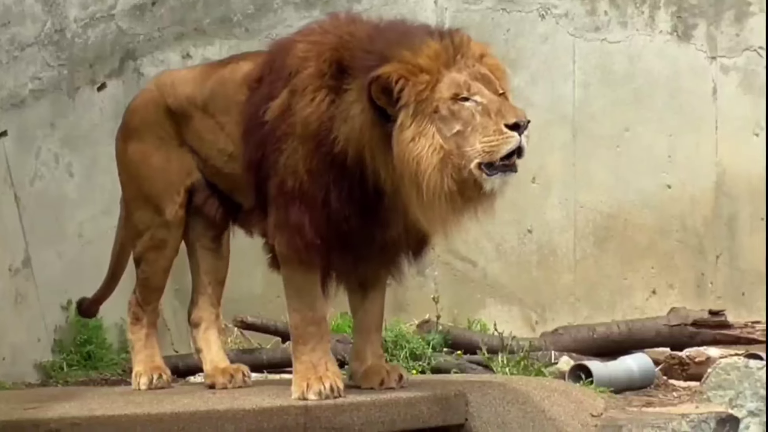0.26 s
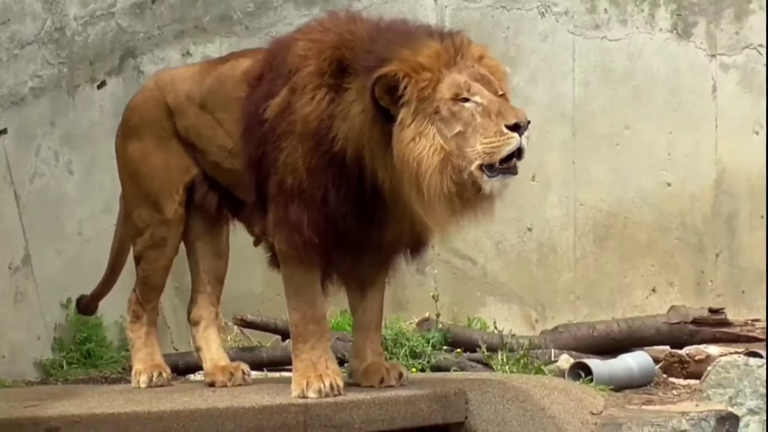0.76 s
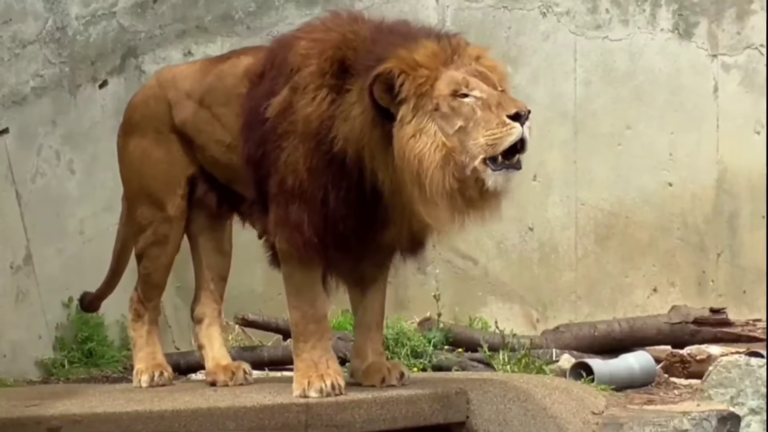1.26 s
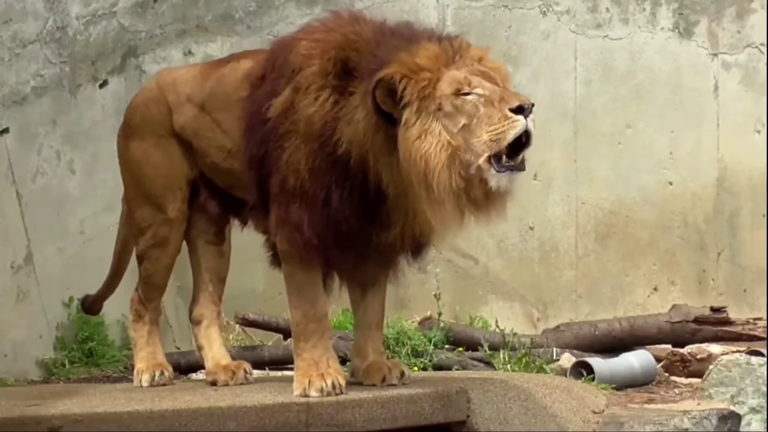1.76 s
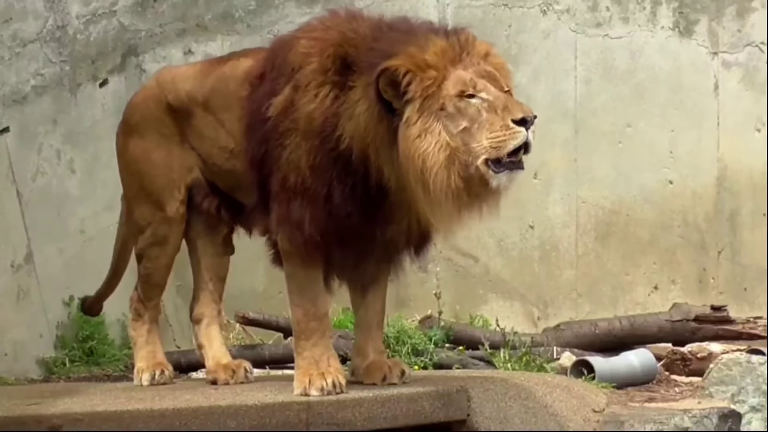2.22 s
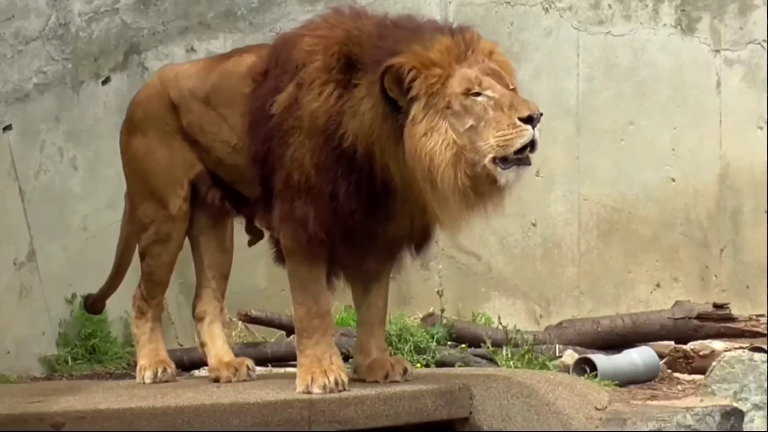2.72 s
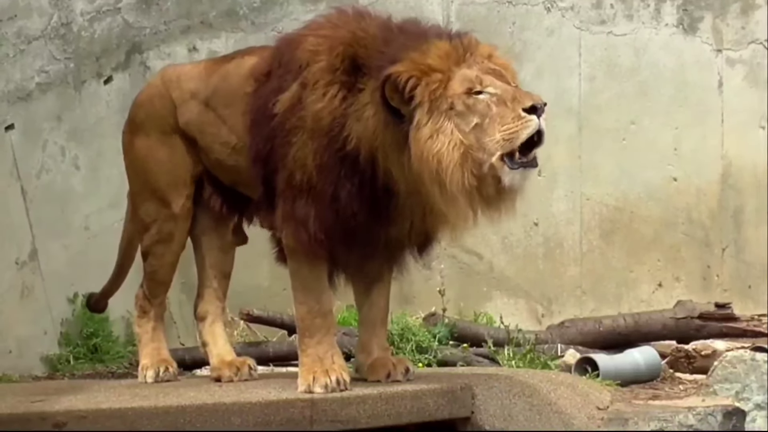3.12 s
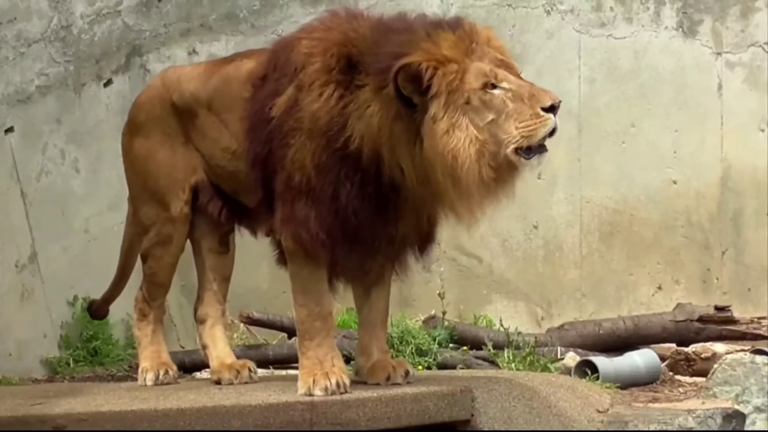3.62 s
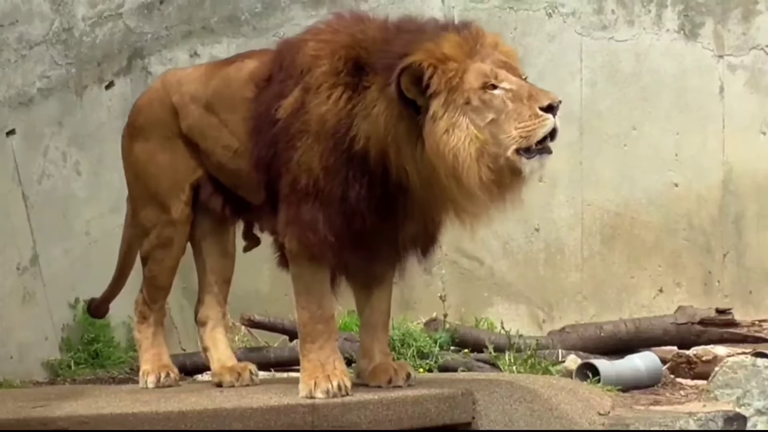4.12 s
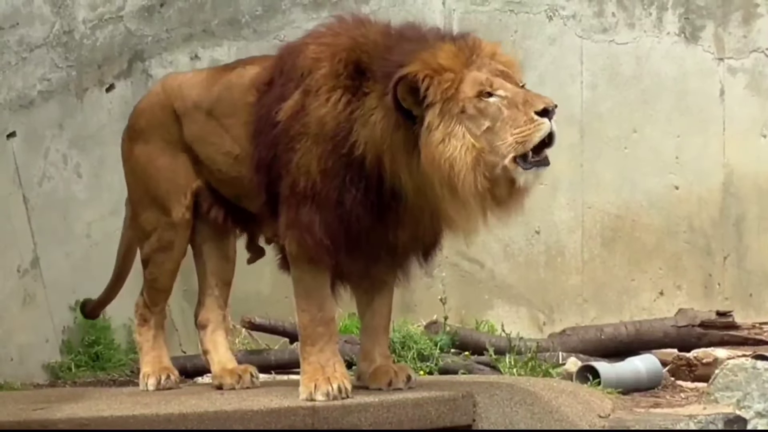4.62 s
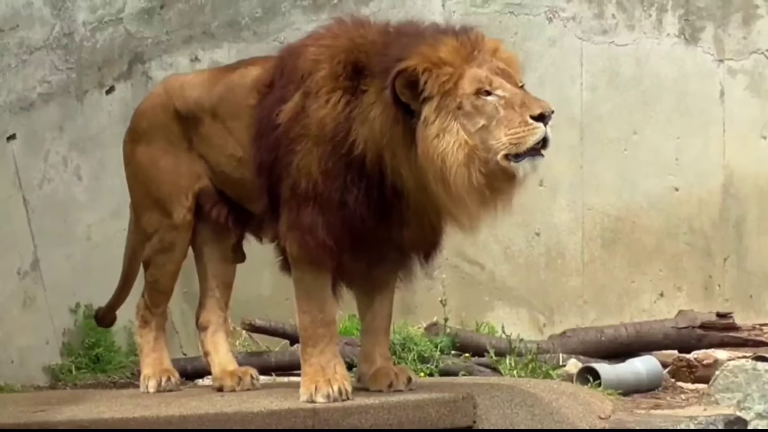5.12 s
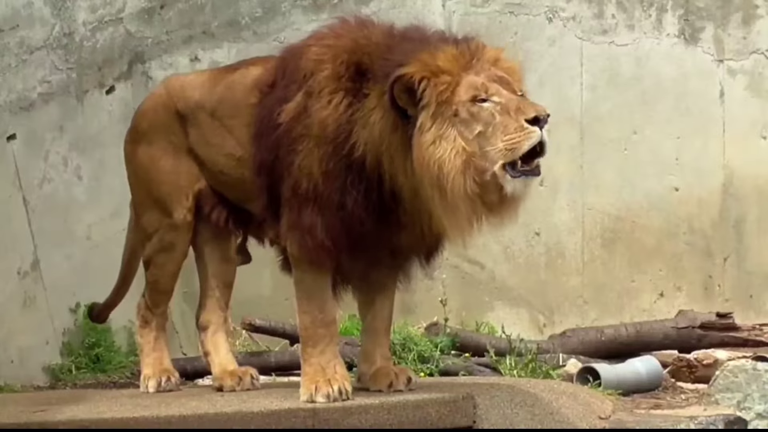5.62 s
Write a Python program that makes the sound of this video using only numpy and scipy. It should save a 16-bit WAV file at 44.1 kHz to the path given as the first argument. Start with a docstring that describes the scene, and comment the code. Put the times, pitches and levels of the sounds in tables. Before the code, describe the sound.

A lion gives eight hoarse, short grunting roars in a concrete enclosure, gradually spacing out and tiring, over faint outdoor air.

```python
"""Quiet outdoor air and a low draught lie under everything, and the echo of an earlier grunt hangs in the walls.
A lion then gives eight hoarse grunts in a concrete enclosure, the later ones further apart and more tired.
Each starts as a deep tone that arches up, breaks into a rasp with a rush of air, and sinks to a low groan.
Flapping folds drive throat and mouth resonances; the walls echo and keep one low note ringing.
Faint scuffs of grainy noise fall between the grunts and after the last."""
import sys
import numpy as np
from scipy import signal
from scipy.fft import rfft, irfft, next_fast_len
from scipy.io import wavfile
from scipy.ndimage import uniform_filter1d

SR = 44100
rng = np.random.default_rng(int(sys.argv[2]) if len(sys.argv) > 2 else 0)


def store_pcm(level_fs):
    """Save levels as 16-bit WAV."""
    pcm = np.round(np.clip(level_fs, -1, 1) * 32767).astype(np.int16)
    wavfile.write(sys.argv[1], SR, np.atleast_2d(pcm).T)


N = 258955
LEAD = SR  # samples: the scene starts one second early, so the walls already ring
SIZE = next_fast_len(N + LEAD, True)

# The grunts of the lion. Each row: start in seconds, length in seconds, reference pitch in Hz,
# slowness factor of its course, roughness factor, tiredness 0-1, tuning factor of the mouth,
# opening catch in dB, then trims in dB for opening tone, closing groan, throat, mouth and rush of air.
GRUNTS = [(.189, .355, 191.6, 1, 1.04, 0.02, .96, -8, 2.2, 3, 0.5, 0, 1),
          (.835, 0.31, 193.3, 0.99, 0.94, 0.17, 0.98, -8, 1.5, 1.5, -2, -.5, .5),
          (1.446, .29, 186.5, 0.93, 1.25, 0.12, 0.97, -15, 0.5, .3, 0, .3, 0.5),
          (2.079, 0.28, 187.2, 1.016, 1.4, 0.18, .98, -6, -1, -.5, 0, 1, 0.5),
          (2.755, .3, 185.7, .92, 1.36, 0.4, 1.0, -8, -.7, -.7, .7, 1.7, 1),
          (3.44, 0.31, 190.6, 1.0, 1.146, 0.67, 1.01, -11, 0, -2, -.5, .3, -.3),
          (4.203, 0.3, 189.9, 1.154, 1.15, 0.68, 1.0, -9, -1.3, .5, 3.3, .3, -1.3),
          (5.006, .29, 179.9, 1.4, 1.07, .95, 0.95, -7, -.5, -2.5, 2.7, -.3, 0)]
EARLIER_S = -.431  # start of a grunt just before, which still echoes
LEAD_IN_S, RELEASE_S = .04, 0.1  # every grunt swells before its start and dies away after its end


def gain_of(db):
    """Decibels to gain."""
    return 10 ** (np.asarray(db) / 20)


def evened(x):
    """Scales to rms 1."""
    return x / np.sqrt(np.mean(x ** 2) + 1e-20)


def steadied(x, size=1500):
    """Holds the short-term rms near 1 and keeps the fine grain."""
    power = uniform_filter1d(uniform_filter1d(x ** 2, size), size)
    return x / np.sqrt(power + 1e-12)


def read(points, hz):
    """Reads a table on a log-frequency axis."""
    f, value = np.transpose(points)
    return np.interp(np.log(hz + 1), np.log(f + 1), value)


def add(mix, s, sound):
    """Mixes a sound in at time s, in seconds."""
    part = mix[:, LEAD + round(s * SR):][:, :sound.shape[-1]]
    part += sound[..., :part.shape[1]]


def noise(spectrum, size):
    """Noise of rms 1, white noise shaped to the given spectrum."""
    bins = rfft(rng.standard_normal(size))
    return evened(irfft(bins * gain_of(read(spectrum, np.fft.rfftfreq(size, 1 / SR))), size))


def wander(hz, size):
    """Random drift of about rms 1: white noise low-passed at the given rate."""
    white = rng.standard_normal(size + SR // 2)  # the extra half second lets the filter settle
    return evened(signal.sosfilt(signal.butter(2, hz, fs=SR, output="sos"), white))[-size:]


def resonate(x, hz, width):
    """A steep resonance of gain 1 that follows the curve hz: shift down, smooth twice, shift back."""
    turn = np.exp(2j * np.pi * np.cumsum(hz * np.ones(len(x))) / SR)
    r = np.exp(-np.pi * width / SR)
    smooth = signal.lfilter([(1 - r) ** 2], [1, -2 * r, r * r], x / turn)
    return 2 * (turn * smooth).real


def tract(drive, modes, tuning):
    """The vocal tract: the drive passes side by side through a set of resonances."""
    return sum(gain_of(db) * resonate(drive, hz * tuning, width) for hz, width, db in modes)


def outdoor_air(level_db=-42):
    """Quiet outdoor air: steady, dark noise, independent on the two sides."""
    # Spectrum of the air. Each row: frequency in Hz, relative density in dB per Hz.
    air_spectrum = [(20, -3.5), (80, 11), (150, 10.5), (250, 4.5), (400, -9), (800, -6), (1200, -8),
                    (1800, -24.5), (4000, -30), (8000, -34.5), (12000, -34), (15000, -41)]
    return gain_of(level_db) * np.array([noise(air_spectrum, SIZE) for _ in range(2)])


def draught(level_db=-45, swell_db=1.5):
    """Air moving over the microphones: drifting low rumble, in opposite phase left and right."""
    # Spectrum of the rumble. Each row: frequency in Hz, relative density in dB per Hz.
    draught_spectrum = [(10, -17), (25, -10), (50, 7), (75, -17), (130, -26), (400, -66), (2000, -100)]
    level = gain_of(level_db + swell_db * wander(3, SIZE))
    return level * noise(draught_spectrum, SIZE) * np.array([[1], [-1]])


def wall_note(wall_hz=148.5, waver_hz=1.3, beat_db=2):
    """A standing wave between the walls: each grunt renews it, later ones less; it wavers and dies slowly."""
    first_db, fade_db_per_s, earlier_db = -26.5, 1.5, -21.5
    build_s, hold_s, decay_db_per_s = 0.34, 0.64, 24
    renewals = [(EARLIER_S, earlier_db)]
    renewals += [(row[0], first_db - fade_db_per_s * row[0]) for row in GRUNTS]
    t = (np.arange(SIZE) - LEAD) / SR
    level = np.zeros(SIZE)
    for start, db in renewals:
        build = np.clip((t - start) / build_s, 0, 1)
        decay_db = decay_db_per_s * np.maximum(t - start - hold_s, 0)
        level = np.maximum(level, build * gain_of(db - decay_db))
    beating = gain_of(beat_db * wander(11.4, SIZE))
    hz = wall_hz + waver_hz * wander(14.2, SIZE)
    return level * beating * np.sin(2 * np.pi * np.cumsum(hz) / SR)


def swell(age, length, push):
    """Gain that rises, holds, sags, and is released when the grunt ends."""
    peak_db, full, rise, held, sag, release = push
    rise_db = rise * np.maximum(full - age, 0)
    sag_db = sag * np.maximum(age - held, 0)
    release_db = release * np.maximum(age - length, 0)
    return gain_of(peak_db - rise_db - sag_db - release_db)


def flapping_folds(turns, rough, shimmer=0.68, doubling=.45):
    """Heavy folds flap unevenly, giving harmonics, and let out a noisy puff of air each cycle."""
    size = len(turns)
    alternation = doubling * rough * np.cos(np.pi * turns)  # strong and weak cycles
    flap = np.maximum(1 + shimmer * rough * wander(77.4, size) + alternation, 0)
    folds = flap * sum(np.cos(2 * np.pi * k * turns) for k in range(1, 18))
    breath = noise([(2500, -3), (4000, -48)], next_fast_len(size))[:size]
    puffs = flap * (0.25 + np.exp(-(turns % 1) / 0.17)) * breath
    drive = (1 - rough) * evened(folds) + rough * evened(puffs)
    return flap, puffs, drive


def deep_tone(turns, flap, puffs, rough, growl_db=-4):
    """A clean fundamental, joined by a growl of puffs in low resonances as the folds roughen."""
    growl = evened(tract(puffs, [(94, 10, -4), (138, 15, 6.5), (198, 16, 3.5)], 1))
    return np.sqrt(flap) * np.sin(2 * np.pi * turns) + gain_of(growl_db) * rough ** 0.95 * growl


def throat_sound(drive, opening, deep_db):
    """The long throat resonates; its weight leaves the deepest resonance as the mouth opens."""
    # Throat resonances, then the deepest one. Each row: frequency in Hz, width in Hz, level in dB.
    throat_modes = [(360, 46, -1), (408, 28, -4), (455, 36, -4.5), (492, 30, -3.5)]
    deepest_mode = (317, 38, 0)  # nominal frequency, tuned slightly down below
    deep = gain_of(deep_db) * (1 - 0.68 * opening) * tract(drive, [deepest_mode], 0.99)
    return (0.3 + 0.67 * opening) * tract(drive, throat_modes, 1) + deep


def mouth_sound(drive, opening, jaw_bend, mouth_tuning, rise, tired, lips_db):
    """Jaw, mouth and upper resonances; the lips ring more as the mouth opens."""
    # Resonances of jaw, mouth, upper tract and lips, before tuning.
    # Each row: frequency in Hz, width in Hz, level in dB.
    jaw_modes = [(680, 65, 3), (742, 42.4, 6.5), (820, 56, 1.8)]
    mouth_modes = [(945, 57, 1.5), (1190, 45, -15)]
    upper_modes = [(1610, 46, -22.5), (2280, 110, -25), (2680, 76, -37)]
    lips_mode = (1044, 80, -2.8)
    tuning = mouth_tuning * (1 + rise * opening)
    jaw = tract(drive, jaw_modes, mouth_tuning * jaw_bend)
    mouth = tract(drive, mouth_modes, tuning)
    upper = (1 - 0.55 * opening) * (1 - 0.3 * tired) * tract(drive, upper_modes, 1)
    lips = gain_of(lips_db) * (0.35 + 0.81 * opening) * tract(drive, [lips_mode], tuning)
    return jaw + mouth + upper + lips


def rush_of_air(turns, flap):
    """Bright hiss, partly common to both sides, that pulses with the folds and flickers at random."""
    # Spectrum of the hiss. Each row: frequency in Hz, relative density in dB per Hz.
    rush_spectrum = [(700, -23), (1400, -3), (2000, -3.5), (3200, -3.3), (3900, -1.2), (4800, -3.5),
                     (6800, -4.5), (8000, -.5), (10500, -3.5), (12500, -7), (14000, -13), (15400, -23)]
    size = len(turns)
    hiss = np.array([noise(rush_spectrum, next_fast_len(size))[:size] for _ in range(3)])
    pulse = 1 + 0.14 * flap * np.cos(2 * np.pi * turns)
    return evened((hiss[:2] + 0.58 * hiss[2]) * pulse * gain_of(1.3 * wander(90, size)))


def grunt(row, jitter=0.0908, usual_s=.31):
    """Folds and puffs of air sound through throat and mouth, each part with its own swell."""
    # The course of every grunt. Each row: seconds from its start before slowing, pitch factor,
    # roughness 0-1 before scaling, mouth opening 0-1, jaw tuning factor.
    gesture = [(-.04, .86, 0.12, 0.3, 0.984), (0, .93, 0.35, 0, .98), (0.026, 1.03, 0.33, 0.07, 1.0),
               (.062, .84, 0.42, 0.6, 1.01), (0.099, .78, 0.58, 0.76, 1.0), (0.152, .82, 0.95, 1, .96),
               (.19, .78, 0.64, 1, .95), (0.232, .745, 0.42, 1, .96), (0.302, .76, 0.38, 0.9, .96),
               (0.401, 0.775, 0.35, 0.6, 0.95)]
    # How each part swells, holds and sags in a grunt of usual length. Each row: peak in dB before trim,
    # full at seconds, rise in dB per second, held until seconds, sag and release in dB per second.
    tone_push = (-13.6, .012, 340, .09, 220, 200)
    groan_push = (-18.6, .225, 330, .285, 48, 180)
    throat_push = (-17.8, .026, 290, 0.04, 42, 350)
    mouth_push = (-20.4, .004, 580, .095, 82, 290)
    air_push = (-40, .006, 640, .08, 78, 260)
    (start, length, reference_hz, slowness, hoarse, tired, mouth_tuning,
     catch_db, tone_db, groan_db, throat_db, mouth_db, rush_db) = row

    # with tiredness the deepest resonance takes over, and lips and mouth tuning fall back
    deep_db = -1 + tired * (9.5 - -1)
    lips_db = -.5 + tired * (-5 - -.5)
    rise = .07 + tired * (-.03 - .07)
    moan_hz = 376 + tired * (322 - 376)

    t = np.arange(-LEAD_IN_S, length + RELEASE_S, 1 / SR)
    size = len(t)
    stretched = t * usual_s / length  # a longer grunt stretches all its swells alike
    pushes = (tone_push, groan_push, throat_push, mouth_push, air_push)
    opening_tone, groan, throat, mouth, rush = (swell(stretched, usual_s, push) for push in pushes)
    age, *course = np.transpose(gesture)
    pitch, rough, opening, jaw_bend = (np.interp(t / slowness, age, c) for c in course)
    rough = np.clip(rough * hoarse, 0, .92)
    turns = np.cumsum(reference_hz * pitch * (1 + jitter * rough * wander(116.0, size))) / SR

    flap, puffs, drive = flapping_folds(turns, rough)
    tone = deep_tone(turns, flap, puffs, rough)
    back = throat_sound(drive, opening, deep_db)
    front = mouth_sound(drive, opening, jaw_bend, mouth_tuning, rise, tired, lips_db)
    moan = resonate(drive, moan_hz, 22)  # the throat sings along with the closing groan

    burst = gain_of(np.interp(t, [-.002, .002], [catch_db, 0]))  # the voice catches abruptly
    tone_level = np.hypot(gain_of(tone_db) * opening_tone, gain_of(groan_db) * groan)
    voice = np.sqrt(burst) * tone_level * steadied(tone)
    voice += burst * gain_of(throat_db) * throat * steadied(back)
    voice += burst * gain_of(mouth_db) * mouth * steadied(front)
    voice += gain_of(groan_db - 9.5) * groan * steadied(moan)
    # the mouth radiates no deep bass
    voice = signal.sosfilt(signal.butter(7, 91, "high", fs=SR, output="sos"), voice)
    air = np.sqrt(burst) * gain_of(rush_db) * rush * rush_of_air(turns, flap)
    fade = np.clip(np.minimum((t - t[0]) / 0.0084, (t[-1] - t) / 0.009), 0, 1)
    return start - LEAD_IN_S, fade * (voice + air)


def enclosure(dry, early_s=0.011):
    """First reflections from floor and walls, then a tail in which each band dies at its own speed."""
    # Echo of the concrete. Each row: frequency in Hz, time to fall 60 dB in seconds,
    # tail level in dB, first reflections in dB, share common to both sides 0-1.
    echo_bands = [(90, 2.36, -7, -13.5, 0.95), (144, 2.76, -17, -21, 0.4), (231, 0.27, -15, -18, 0.18),
                  (376, 1.65, -6, -2.5, 0.5), (550, 1.5, -14.5, -4, 0.32), (750, 1.31, -12, -10.5, 0.83),
                  (980, 1.54, -16.5, -1, 0.65), (1063, 0.88, 1, 5, 0.2), (1380, 0.58, -8, .5, .9),
                  (2320, 0.67, -3, -3, 0.6), (8000, 0.36, -10, -8, 0.6), (14000, 0.34, -31, -14, .3)]
    age = np.arange(3 * SR // 2) / SR
    hits = rng.random((3, len(age))) < 2500 / SR  # sparse: 2500 reflections a second
    taps = rng.standard_normal((3, len(age))) * hits * (age > .002)
    hz, t, z = signal.stft(evened(taps), SR, nperseg=512)
    columns = (read(np.array(echo_bands)[:, [0, k]], hz)[:, None] for k in range(1, 5))
    t60, tail_db, early_db, common = columns
    common = np.clip(common, 0, 1)
    early = gain_of(early_db) * np.exp(-t / early_s) * np.sqrt(2 / early_s / SR)
    onset = np.clip((t - .015) / 0.0095, 0, 1)
    tail = gain_of(tail_db - 60 * t / t60) * onset * np.sqrt(2 * np.log(1000) / SR)
    z = (np.sqrt(1 - common) * z[:2] + np.sqrt(common) * z[2]) * np.hypot(early, tail)
    response = signal.istft(z, SR, nperseg=512)[1]
    response[:, 0] += 1  # the direct sound
    return signal.fftconvolve(dry, response, axes=1)


def scuffs(level_db=-10, squeak=0.25):
    """Short grainy scrapes of decaying noise, each with a faint rising squeak."""
    # Faint scuffs. Each row: time in seconds, relative level in dB, centre in Hz, decay in seconds.
    scuff_rows = [(0.702, -46.5, 4200, 0.034), (1.872, -50, 3700, 0.029), (1.944, -44.5, 3000, 0.038),
                  (2.699, -42, 3580, 0.034), (3.733, -40.5, 2740, 0.018), (4.66, -43, 3700, 0.024),
                  (4.6807, -36.5, 4350, 0.013), (4.743, -46.5, 4400, 0.033), (5.7632, -42.5, 4255, 0.085),
                  (5.84, -42.5, 3610, 0.026)]
    out, t = np.zeros((2, SIZE)), np.arange(SR // 5) / SR
    for s, db, hz, decay in scuff_rows:
        colour = [(hz / 4, -18), (hz * 0.49, -7), (hz, 0), (hz * 1.42, -10), (hz * 4, -19)]
        scrape = np.array([noise(colour, len(t)) for _ in range(2)])
        rising_hz = hz * np.interp(t, [0, .03], [.95, 1.08])
        ring = evened(resonate(rng.standard_normal(len(t)), rising_hz, 500))
        grain = gain_of(2.2 * wander(150, len(t)))
        shape = np.minimum(t / 0.0031, 1) * np.exp(-t / decay) * grain
        add(out, s - .003, gain_of(db + level_db) * shape * (scrape + squeak * ring))
    return out


def leaned(x):
    """Each band reaches the two microphones at slightly different strength."""
    # Stereo lean of the enclosure's sounds. Each row: frequency in Hz, left minus right in dB.
    lean_bands = [(80, -0.5), (280, 1.5), (470, -0.1), (600, -2), (740, 2), (940, -0.5), (1070, -3),
                  (1300, -2), (1450, .4), (3000, 0.5), (14000, -0.5)]
    lean = read(lean_bands, np.fft.rfftfreq(SIZE, 1 / SR))
    return irfft(rfft(x) * gain_of([lean / 2, -lean / 2]), SIZE)


def scene():
    """The lion in the enclosure over quiet outdoor air; every grunt gets its own random echoes."""
    background = outdoor_air() + draught()
    lion = np.zeros((2, SIZE))
    earlier = enclosure(grunt(GRUNTS[0])[1])
    add(lion, EARLIER_S - LEAD_IN_S, gain_of(-1.5) * earlier)
    for row in GRUNTS:
        s, sound = grunt(row)
        add(lion, s, enclosure(sound))
    near = leaned(wall_note() + lion + enclosure(scuffs())[:, :SIZE])
    return (near + background)[:, LEAD:LEAD + N]


def record(dry, ceiling=0.82, edge_hz=15300):
    """Rounds off the highest peaks, then limits the band with a steep low-pass."""
    limited = dry / (1 + (dry / ceiling) ** 8) ** (1 / 8)
    low_pass = signal.firwin(511, edge_hz, window=("kaiser", 9), fs=SR)
    return signal.oaconvolve(limited, low_pass[None], "same")


dry = scene()
out = record(dry)
store_pcm(out)
```